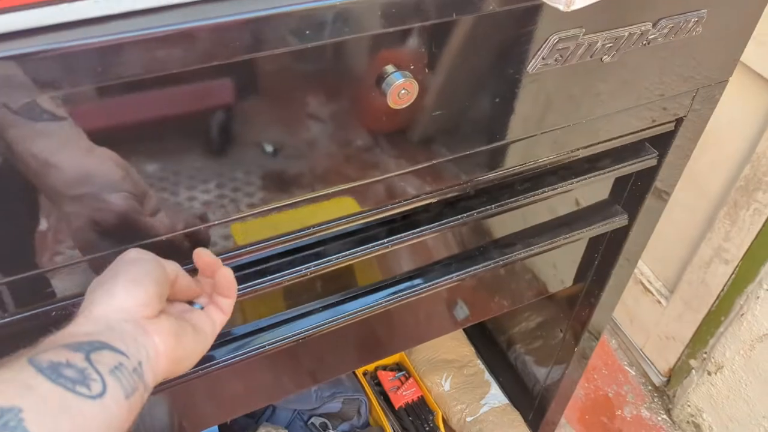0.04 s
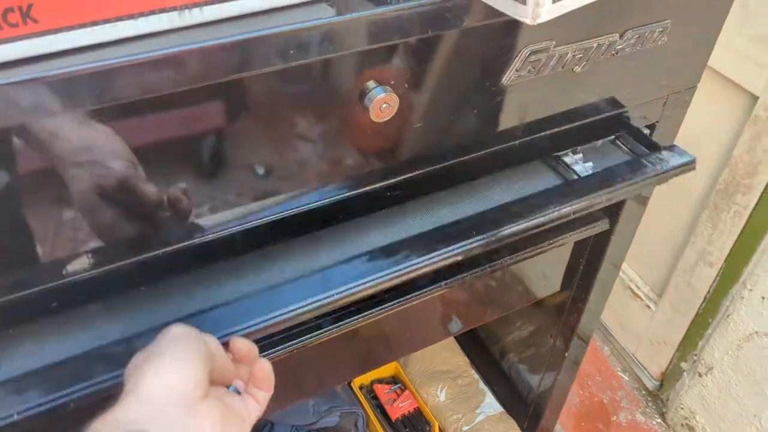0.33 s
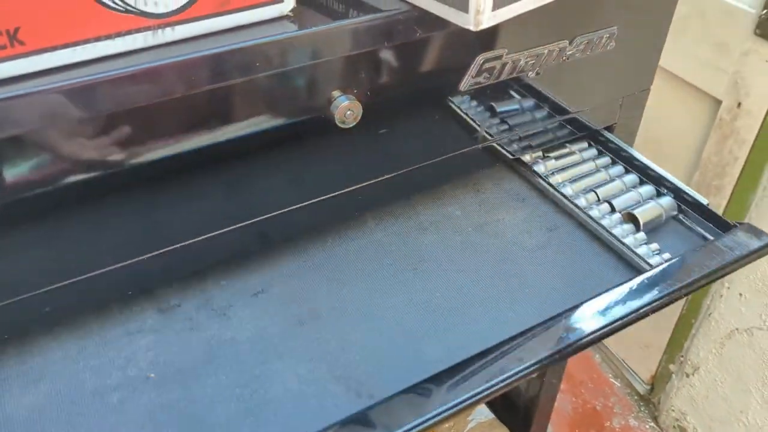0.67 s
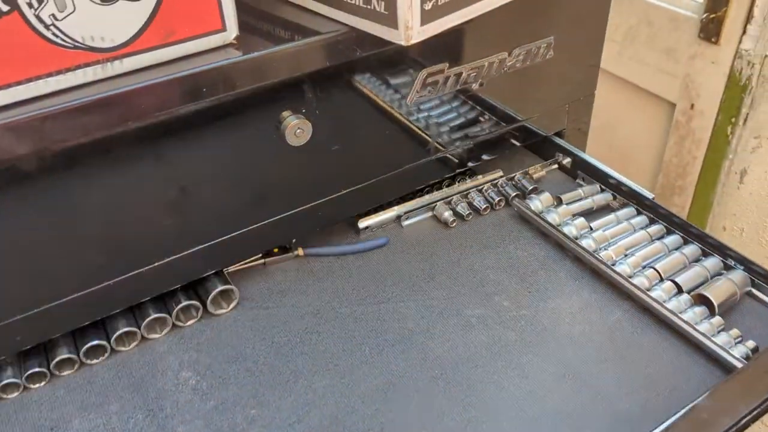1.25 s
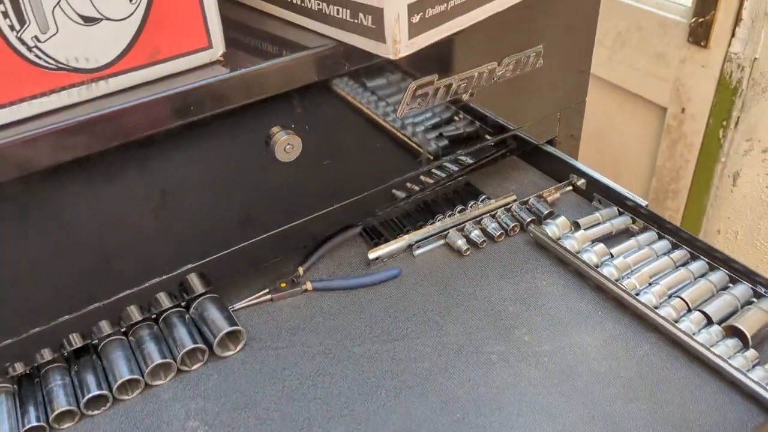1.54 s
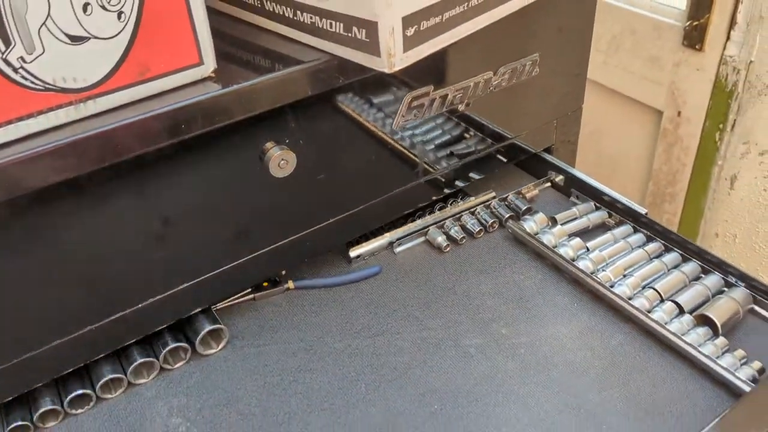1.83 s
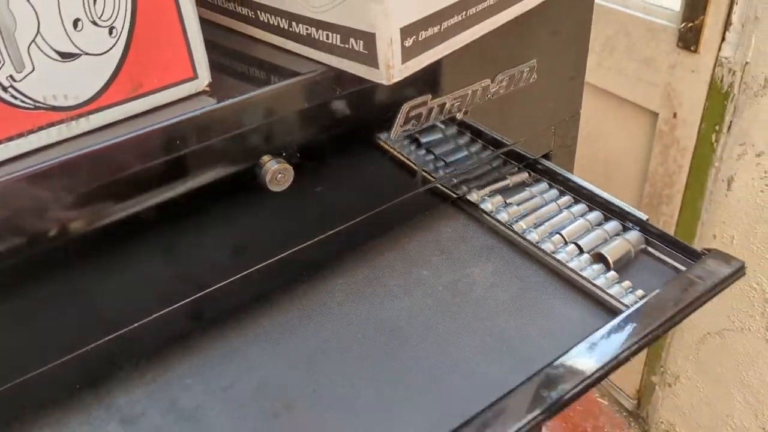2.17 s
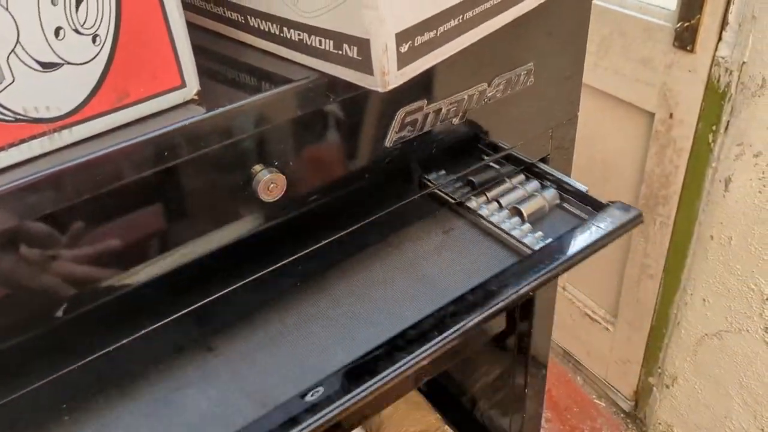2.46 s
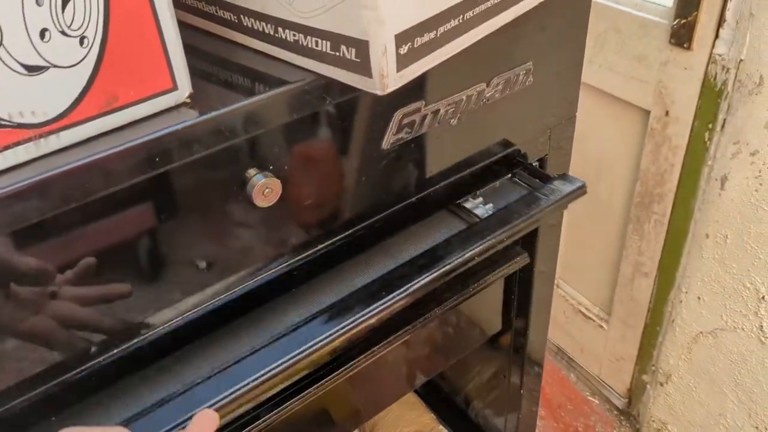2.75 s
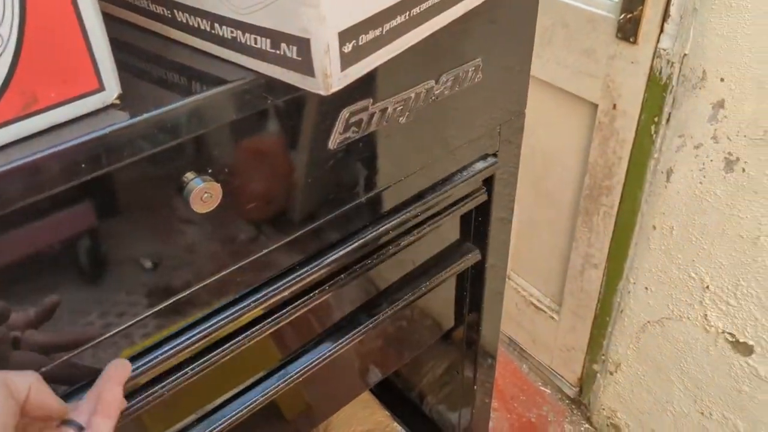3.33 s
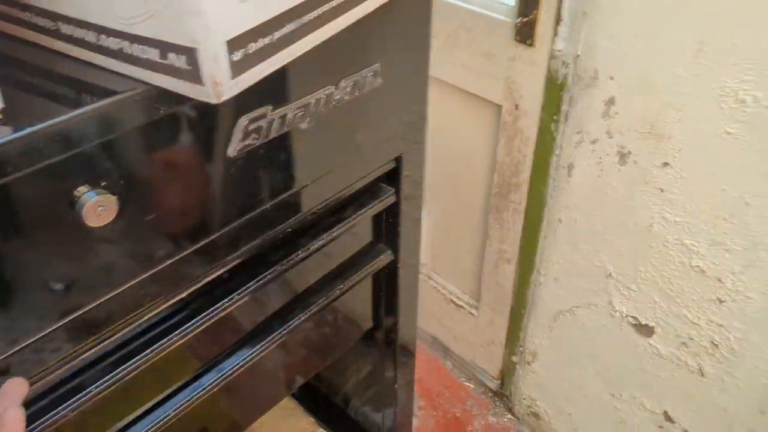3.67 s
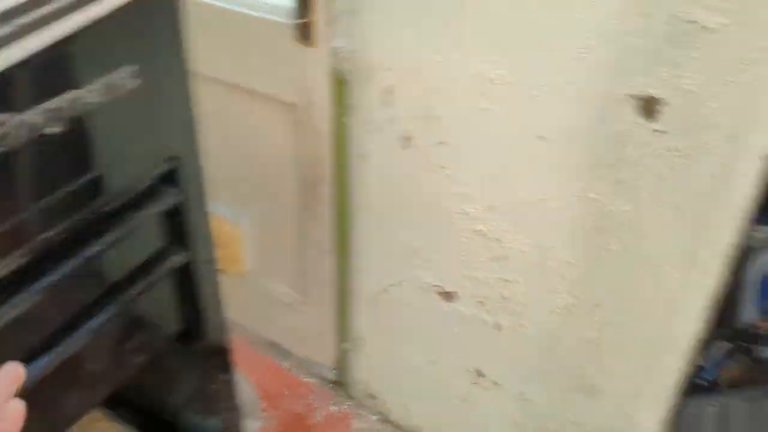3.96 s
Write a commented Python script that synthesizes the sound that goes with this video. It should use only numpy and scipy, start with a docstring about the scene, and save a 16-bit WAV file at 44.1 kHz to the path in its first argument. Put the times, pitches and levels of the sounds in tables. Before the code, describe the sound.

A steel tool chest drawer unlatches with clicks at the start, rolls out and bumps its stop at about 0.7 seconds. The rolling fades, then resumes near 1.8 seconds as the drawer slides back, with a sharp metallic knock at 2.3. Clicks and short scrapes follow around 3 seconds, and it shuts at 3.5 with a clunk and a rattle of sockets, close up in a quiet workshop.

```python
"""Tool-chest drawer, opened and shut

Close up in a small, quiet workshop, on a stereo microphone. A steel drawer is unlatched, rolls out
on ball-bearing slides and bumps its stop. It rolls back, the slide sections knock as they telescope,
and it is pressed shut with a rattling clunk of sockets and latch.
Every knock and scrape rings the same sheet-steel body."""
import sys
import numpy as np
from scipy import signal
from scipy.io import wavfile

SR = 44100
rng = np.random.default_rng(int(sys.argv[2]) if len(sys.argv) > 2 else 0)


def transcribe(u):
    """Save the signal u as a 16-bit wav file named by the first command-line argument.

    u: samples, shape (n,) or (channels, n), limited to [-1, 1]; the rate is SR.
    q: integer samples, one column per channel.
    """
    v = np.clip(np.atleast_2d(u).T, -1, 1)
    q = np.round(v * 32767).astype(np.int16)
    wavfile.write(sys.argv[1], SR, q)


N = 176400

# room tone of the workshop: (frequency [Hz], level per Hz [dB])
ROOM_SPECTRUM = [(25, -11), (60, -4), (110, -3.5), (145, 14), (190, -4), (400, -4.5), (800, -22),
                 (2000, -19.5), (5000, -26), (9000, -28.5), (16000, -32.5)]
# whisper of the bearings while the slides are extended: (time [s], level [dB])
BEARING_LEVEL = [(0, -51), (.3, -52), (.8, -54), (1, -58.5), (1.2, -51.5), (1.45, -60), (1.7, -66.5),
                 (1.85, -56), (2.2, -52), (2.55, -63.5), (2.9, -95), (3.3, -74), (4, -81)]
# colour of that whisper: (frequency [Hz], level per Hz [dB])
BEARING_COLOUR = [(700, 5.5), (1300, 10), (2400, 8.5), (4000, 1), (5600, -14.5), (9000, -12),
                  (13000, -24.5), (16000, -11)]
# resonances of the ball cages: (frequency [Hz], width [Hz], level [dB])
CAGE_RESONANCES = [(1424, 47, -12), (2140, 49, -12.5), (2378, 40, -12), (2743, 43, -14.5), (7220, 150, -18),
                   (9050, 180, -17)]
# speed of the drawer, heard as the level of its rolling: (time [s], level [dB])
ROLL_LEVEL = [(0, -58), (.2, -78.5), (.33, -40.5), (.48, -36), (.66, -37), (.85, -46.5), (1.12, -48),
              (1.4, -57.5), (1.7, -70), (1.85, -48.5), (2.08, -43.5), (2.25, -43), (2.5, -40.5),
              (2.68, -46), (2.9, -51), (3.08, -46), (3.27, -67), (3.7, -76), (4, -115)]
# rumble of the drawer floor: (frequency [Hz], level per Hz [dB])
ROLL_COLOUR = [(40, -17), (120, -2), (210, -11), (320, -5), (460, 6), (620, -2), (1000, -11.5),
               (2300, -20.5), (5500, -40.5), (9000, -44.5), (16000, -50)]
# resonances rung by the balls on the rails: (frequency [Hz], width [Hz], level [dB])
RAIL_RESONANCES = [(287, 10, -12), (332, 42, -7), (393.3, 31, -15), (445, 8.5, -8), (470.4, 33, -5.5),
                   (507, 27, -21.5), (783, 50, -14.5)]
# colour of the struck steel: (frequency [Hz], level per band [dB])
STEEL_COLOUR = [(30, -52), (50, -22), (75, -15), (120, -9.5), (180, -6.5), (350, -3), (600, -11),
                (950, -11.5), (1450, -6), (2500, -3.5), (3400, -8), (4300, -5.5), (5500, -19), (7000, -7),
                (7900, -12), (9200, -4.5), (12000, -21), (15500, -18.5)]
# how long the steel rings: (frequency [Hz], time to fall 60 dB [s])
STEEL_DECAY = [(115, 0.34), (450, 0.34), (800, 0.29), (1400, 0.24), (2400, .25), (4000, 0.28), (9000, .22),
               (16000, 0.28)]
# clearest modes of drawer and chest: (frequency [Hz], level [dB])
STEEL_MODES = [(120, -1), (372, -9.5), (405, -7.5), (483, -8.5), (718, -17.5), (781, -14.5), (830, -15),
               (1255, -13.5), (1408, -10), (1725, -14.5), (2148, -22), (2376, -11), (2725, -24)]
# steel sliding over steel: (time [s], rise [s], hold [s], release [s], panel [dB], clang [dB],
# tick [dB], pitch of the rubbing part [Hz], its boost [dB], left minus right [dB])
STEEL_SCRAPES = [ (0.128, .008, 0.015, 0.014, -50, -50, -35.5, 5440, 7, -0.5),
                 (.150, 0.0039, .012, 0.0053, -59, -46, -41, 9550, 8, -2),
                 (0.207, 0.0078, 0.016, 0.014, -40, -53.5, -48, 4300, 4.5, 1),
                 (0.516, 0.0075, 0.0059, .004, -60, -42, -47, 3630, 11.5, -3.5),
                 (0.54, 0.0025, 0.0099, 0.018, -53, -40.5, -44, 3400, 7, -3.5),
                 (0.674, 0.0094, 0.0038, 0.0035, -29.5, -42, -29.5, 12800, 5, -0.5),
                 (1.811, 0.018, 0.017, 0.032, -58, -55, -66, 2500, 0, 2),
                 (2.962, 0.014, 0.0023, 0.0019, -46, -31, -31, 3800, 4.5, -0.5),
                 (3.368, 0.03, 0.0099, 0.01, -62.5, -45.5, -45, 10700, 6.5, 1.5),
                 (3.431, 0.0068, 0.022, 0.014, -47.5, -47, -58, 2380, 0, 1),
                 (3.483, 0.013, 0.045, 0.017, -42, -30.5, -38, 720, 12, 1),
                 (3.724, 0.0031, 0.038, 0.015, -63.5, -56, -49.5, 4300, 6, -1)]
# knocks of latch, stops and slides: (time [s], thump [dB], panel [dB], clang [dB], tick [dB],
# chatter length [s], pitch of the struck part [Hz], its boost [dB], left minus right [dB])
STEEL_KNOCKS = [ (.002, -57, -79.5, -72, -58.5, 0.015, 3300, 15.5, 2),
                (.075, -72, -78, -46, -55, 0.0022, 2900, 3, -1),
                (.086, -68, -76, -69, -50.5, 0.0032, 3600, 19.5, 0),
                (0.104, -38, -41, -37, -56, .008, 1710, 10.5, 0.5),
                (.303, -57, -35.5, -41, -64, 0.014, 1620, -3.5, -4),
                (.422, -75, -34, -51, -53, 0.016, 1480, 13.5, -2),
                (0.5441, -67, -43, -45.5, -43, 0.0059, 3330, 4, 1),
                (.683, -25.5, -38, -28.5, -48, 0.007, 1400, 3, 0),
                (2.2863, -36, -30, -26, -32, 0.0018, 1320, 7, -1),
                (2.2898, -66.5, -29.5, -32.5, -38.5, 0.0023, 1510, 2.5, 3.5),
                (3.026, -45, -35.5, -44.5, -68, 0.0057, 1140, 1, 1.5),
                (3.0992, -44, -38.5, -31.5, -45.5, 0.0014, 2000, 8.5, 1),
                (3.123, -42, -39.5, -53, -47.5, 0.01, 2300, -9, 1),
                (3.314, -68.5, -73.5, -65, -72, 0.0036, 2210, 0.5, 5),
                (3.410, -52, -43.5, -46, -44, 0.0057, 2050, 5, -1),
                (3.497, -73, -23.5, -33, -29, .008, 3430, 8.5, 0.5),
                (3.520, -67, -36.5, -34, -30.5, 0.026, 750, 10.5, 0),
                (3.541, -54, -32, -42, -35.5, 0.0048, 463, 7.5, -4),
                (3.578, -62, -33, -44.5, -46, 0.018, 740, -13, 0.5)]
# stereo width at the microphone: (frequency [Hz], side minus mid [dB])
MIC_WIDTH = [(60, -6.5), (110, -21), (200, -25.5), (380, -10), (700, 0), (1290, 1), (2380, 1), (4400, 0.5),
             (8000, -10.5), (11000, -37), (15000, -20.5)]
# balance at the microphone: (frequency [Hz], left minus right [dB])
MIC_BALANCE = [(40, 24), (60, 22.5), (110, -1.5), (160, 4), (270, -2.5), (450, 6.5), (740, -0.5),
               (1220, -7), (1600, -4.5), (2200, 8), (3200, 2.5), (5500, -1.5), (9000, 0.5), (15000, 0)]

BAND_EDGES = np.r_[np.geomspace(25, 800, 13)[:-1], np.geomspace(800, 17000, 26)]  # Hz
BAND_HZ = np.sqrt(BAND_EDGES[1:] * BAND_EDGES[:-1])
TIME = np.arange(N) / SR
RING_TIME = TIME[:SR // 3]

ROOM_DB, RUMBLE_DB, WHISPER_DB = -58, -4, -1.5
TUG_S, TUG_HZ, TUG_DB, TUG_WIDTH_S, TUG_SAG_HZ_PER_S = 0.21, 62, -31.5, 0.049, 680
BALL_TICKS_PER_S, BALL_SPREAD_DB = 4000, 2.5
SNAP_T60_S, SNAP_DB, CRACK_T60_S, CRACK_DB = 0.018, 10.5, 0.058, -1  # levels against the long ring
CLINK_COUNT, CLINK_LOW_HZ, CLINK_HIGH_HZ, CLINK_DB, CLINK_T60_S = 14, 1992, 14870, -7.5, 0.15
TONE_HZ = (124, 370, 1440, 8970)  # thump, panel, clang, tick
PART_WIDTH_OCTAVES = 0.32
RUBS_PER_S, RUB_BASS_DB = 2500, -6.5
CHATTER_HITS_PER_S, CHATTER_SPREAD_DB, CHATTER_GAIN_PER_S = 2000, 5, 227
LOW_CUT_HZ, HIGH_CUT_HZ = 48, 16200


def from_db(db):
    return 10 ** (np.asarray(db) / 20)


def unit_rms(x):
    return x / np.sqrt(np.mean(x ** 2) + 1e-20)


def at_hz(points, hz):
    """Reads a table on a log-frequency axis."""
    table_hz, values = np.transpose(points)
    return np.interp(np.log(hz), np.log(table_hz), values)


def fader(rows):
    """Gain over time from rows of (time [s], level [dB])."""
    return from_db(np.interp(TIME, *np.transpose(rows)))


def drift(turns_per_s):
    """A random wander with rms 1."""
    knots = rng.standard_normal(1000)
    return unit_rms(np.interp(TIME * turns_per_s, np.arange(len(knots)), knots))


def pan(db):
    """Left and right gains, db apart."""
    return from_db(db * np.array([[.5], [-.5]]))


def stereo(pair, hz):
    """Two unrelated signals become left and right, with the microphone's image at this pitch."""
    width = from_db(at_hz(MIC_WIDTH, hz))
    balance = unit_rms(pan(at_hz(MIC_BALANCE, hz)))
    side = width * pair[1] * np.array([[1], [-1]])
    return balance * (pair[0] + side) / np.hypot(1, width)


def band(pair, k):
    """Band k of two noises, as one stereo signal."""
    sos = signal.butter(2, BAND_EDGES[k:k + 2], "band", fs=SR, output="sos")
    return stereo([unit_rms(v) for v in signal.sosfilt(sos, pair + 1e-18)], BAND_HZ[k])


def coloured(sources, spectrum, flutter_db):
    """Shapes two noise pairs band by band, each band fluttering; rms 1."""
    gains = from_db(at_hz(spectrum, BAND_HZ)) * np.sqrt(np.diff(BAND_EDGES))
    out = 0
    for k, gain in enumerate(gains):
        flutter = from_db(flutter_db * drift(turns_per_s=24.77))
        out += gain * flutter * band(sources[k % 2], k)
    return unit_rms(out)


def contacts(shape, per_s, spread_db):
    """Random tiny impacts; spread_db makes their sizes uneven."""
    sizes = from_db(spread_db * np.minimum(rng.exponential(1, shape), 4))
    signs = rng.choice([-1, 1], shape)
    return sizes * signs * (rng.random(shape) < per_s / SR)


def add(out, start_s, sound):
    """Mixes a sound in at start_s."""
    i = max(int(start_s * SR), 0)
    out[:, i:i + sound.shape[1]] += sound[:, :N - i]


def room_tone():
    """The workshop behind the chest: faint, low, wavering noise."""
    return from_db(ROOM_DB) * coloured(rng.standard_normal((2, 2, N)), ROOM_SPECTRUM, flutter_db=1.5)


def tug():
    """The chest sways under the pull: a few slowing swings as the drawer comes free."""
    t = TIME - TUG_S
    cycles = (TUG_HZ - TUG_SAG_HZ_PER_S * t / 2) * t
    swing = np.exp(-(t / TUG_WIDTH_S) ** 2) * np.exp(2j * np.pi * cycles)
    return from_db(TUG_DB) * stereo([swing.real, swing.imag], TUG_HZ)


def ball_ringing(modes):
    """Ball ticks keep narrow resonances ringing."""
    out = 0
    for hz, width_hz, db in modes:
        ticks = contacts((2, N), BALL_TICKS_PER_S, BALL_SPREAD_DB)
        ring = signal.lfilter(*signal.iirpeak(hz, hz / width_hz, fs=SR), ticks)
        out += from_db(db) * unit_rms(stereo(ring, hz))
    return out


def bearings():
    """Fine ticking of the balls, ringing faintly in their cages."""
    ticks = contacts((2, 2, N), BALL_TICKS_PER_S, BALL_SPREAD_DB)
    whisper = from_db(WHISPER_DB) * coloured(ticks, BEARING_COLOUR, flutter_db=1)
    return fader(BEARING_LEVEL) * (whisper + ball_ringing(CAGE_RESONANCES))


def rolling():
    """Balls running over the rails make the drawer floor rumble and ring."""
    bumps = contacts((2, 2, N), BALL_TICKS_PER_S, BALL_SPREAD_DB)
    rumble = from_db(RUMBLE_DB) * coloured(bumps, ROLL_COLOUR, flutter_db=1)
    return fader(ROLL_LEVEL) * (rumble + ball_ringing(RAIL_RESONANCES))


def mode_ring(hz, t60_s):
    """One mode of struck steel: a dying sine in stereo."""
    phase = 2 * np.pi * hz * RING_TIME
    return stereo([np.sin(phase), np.cos(phase)], hz) * from_db(-60 * RING_TIME / t60_s)


def steel_body():
    """The chest's crowded modes as noise bands, their snap, crack and decay, and its clear modes."""
    t, hz = RING_TIME, BAND_HZ[:, None]
    white = rng.standard_normal((2, 2, SR * 2))
    crowded = np.array([band(white[k % 2], k) for k in range(len(BAND_HZ))])
    snap = from_db(SNAP_DB - 60 * t / SNAP_T60_S)
    crack = from_db(CRACK_DB - 60 * t / CRACK_T60_S)
    ring = from_db(-60 * t / at_hz(STEEL_DECAY, hz))
    onset = (1 - np.exp(-t * hz)) ** 2
    envelope = onset * (snap + crack + ring)
    clear = [mode_ring(f, at_hz(STEEL_DECAY, f)) for f, _ in STEEL_MODES]
    return crowded, envelope[:, None], np.array(clear)


def sockets():
    """Shaken loose sockets clink at random pitches across the treble; gives pitches and rings."""
    steps = (np.arange(CLINK_COUNT) + rng.random(CLINK_COUNT)) / CLINK_COUNT
    pitches = CLINK_LOW_HZ * (CLINK_HIGH_HZ / CLINK_LOW_HZ) ** steps
    return pitches, [mode_ring(hz, CLINK_T60_S) for hz in pitches]


def ring_chest(body, force, tone_db, part_hz, part_db, pan_db):
    """A force rings the body and the sockets, with a boost or dip at the pitch of the part it hits."""
    crowded, envelope, clear = body
    start = rng.integers(SR // 4, SR)  # every contact finds its own mix of modes
    dying_bands = crowded[:, :, start:start + len(RING_TIME)] * envelope
    clink_hz, clinks = sockets()
    rings = np.concatenate([dying_bands, clear, clinks])
    mode_hz, mode_db = np.transpose(STEEL_MODES)
    pitches = np.r_[BAND_HZ, mode_hz, clink_hz]
    db = np.r_[at_hz(STEEL_COLOUR, BAND_HZ), mode_db, at_hz(STEEL_COLOUR, clink_hz) + CLINK_DB]
    db += at_hz(list(zip(TONE_HZ, tone_db)), pitches)
    db += part_db * np.exp(-(np.log2(pitches / part_hz) / PART_WIDTH_OCTAVES) ** 2)
    rung = signal.fftconvolve(rings, force[None, None], axes=2)
    # each ring's rms if all its energy fell within 22 ms
    strength = np.sqrt((rung ** 2).sum((1, 2)) / (2 * .022 * SR) + 1e-20)
    return np.tensordot(from_db(db) / strength, rung, 1) * pan(pan_db)


def scrapes(body):
    """Dense contacts swell, hold and fade as the latch and slides rub."""
    out, t = np.zeros((2, N)), TIME[:SR // 6]
    for start_s, rise, hold, release, panel_db, clang_db, tick_db, *part in STEEL_SCRAPES:
        pressure = np.minimum(t / rise, 1) * np.exp(-np.maximum(t - rise - hold, 0) / release)
        force = pressure * contacts(len(t), RUBS_PER_S, spread_db=0)
        gain = np.sqrt(np.sum(pressure ** 2) / (0.015 * SR))  # a longer rub carries more energy
        tone_db = (panel_db + RUB_BASS_DB, panel_db, clang_db, tick_db)
        add(out, start_s, gain * ring_chest(body, force, tone_db, *part))
    return out


def knocks(body):
    """Each knock is one impact followed by a short chatter of loose parts."""
    out, t = np.zeros((2, N)), TIME[:SR // 20]
    for start_s, *tone_db, chatter_s, part_hz, part_db, pan_db in STEEL_KNOCKS:
        chatter = contacts(len(t), CHATTER_HITS_PER_S, CHATTER_SPREAD_DB) * np.exp(-(t / chatter_s) ** 2)
        force = CHATTER_GAIN_PER_S * chatter_s * chatter / (np.linalg.norm(chatter) + 1e-9)
        force[0] += 1  # the impact itself
        add(out, start_s, ring_chest(body, force, tone_db, part_hz, part_db, pan_db))
    return out


def scene():
    """The drawer close up, over the quiet of the workshop."""
    body = steel_body()
    room = room_tone()
    return knocks(body) + scrapes(body) + rolling() + bearings() + tug() + room


def record(dry):
    """The microphone loses the deepest bass; the top is cut steeply."""
    low_cut = signal.butter(4, LOW_CUT_HZ, "high", fs=SR, output="sos")
    high_cut = signal.ellip(12, .1, 80, HIGH_CUT_HZ, fs=SR, output="sos")
    return signal.sosfilt(high_cut, signal.sosfilt(low_cut, dry))


dry = scene()
out = record(dry)
transcribe(out)
```